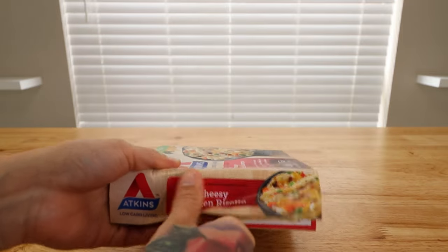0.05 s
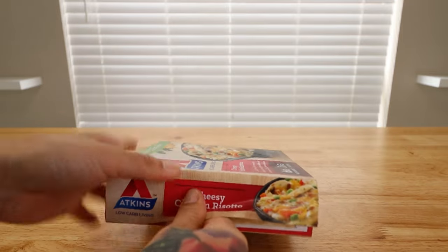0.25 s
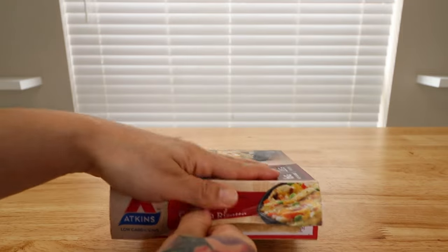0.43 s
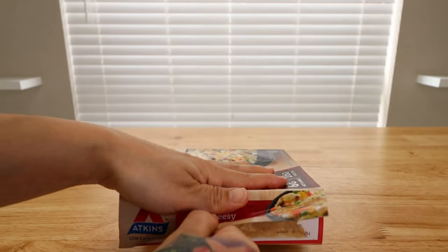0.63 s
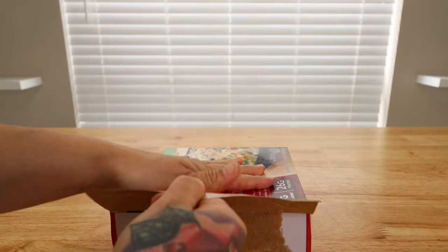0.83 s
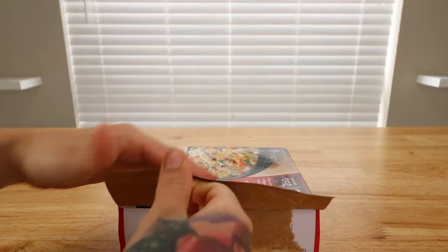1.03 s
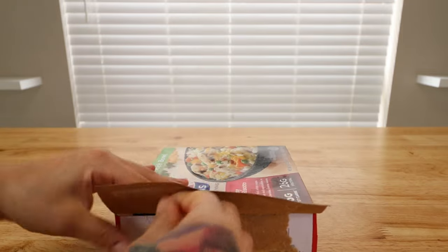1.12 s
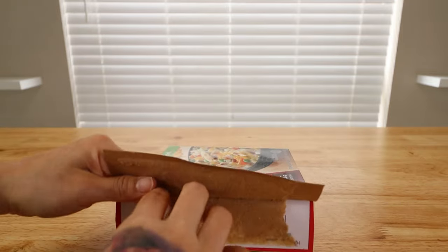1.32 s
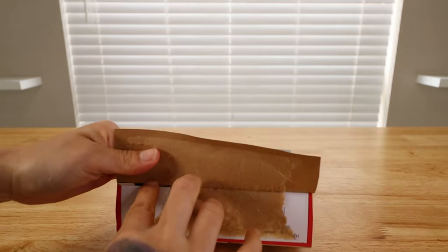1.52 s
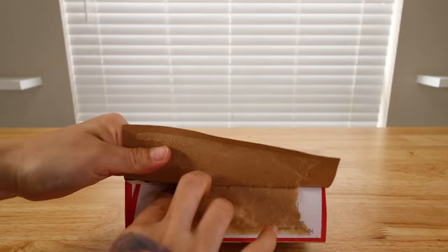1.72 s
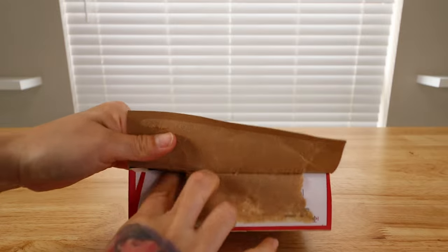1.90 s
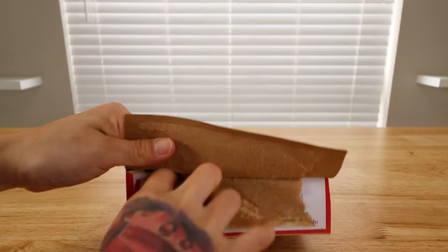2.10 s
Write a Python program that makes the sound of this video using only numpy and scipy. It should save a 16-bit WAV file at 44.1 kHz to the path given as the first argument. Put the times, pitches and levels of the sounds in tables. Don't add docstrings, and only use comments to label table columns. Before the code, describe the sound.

A glued cardboard box is torn open by hand, crackling, then bursting with a hollow knock

```python
import sys
import numpy as np
from scipy import signal
from scipy.fft import rfft, irfft, next_fast_len
from scipy.io import wavfile
from scipy.ndimage import uniform_filter1d, map_coordinates

SR = 44100
rng = np.random.default_rng(int(sys.argv[2]) if len(sys.argv) > 2 else 0)


def natural_amplitude(level_db):
    exponent = np.asarray(level_db, float) / 20
    return 10 ** exponent


def waveform_to_disk(signal):
    frames = np.transpose(np.atleast_2d(signal))
    scaled = np.clip(frames, -1, 1) * 32767
    samples = np.round(scaled).astype(np.int16)
    wavfile.write(sys.argv[1], SR, samples)


N = 94815


def unit(x):
    return x / np.sqrt(np.mean(x ** 2) + 1e-20)


def along(points, hz):
    f, v = np.transpose(points)
    return np.interp(np.log(hz + 1), np.log(f + 1), v)


def coloured(x, points, tilt_db=0.):
    m = next_fast_len(len(x) + 8192)
    hz = np.fft.rfftfreq(m, 1 / SR)
    level_db = along(points, hz) + tilt_db * np.log2(hz / 3000 + .05)
    cepstrum = irfft(np.log(np.maximum(natural_amplitude(level_db), 1e-6)), m)
    cepstrum[1:m // 2] *= 2
    cepstrum[m // 2 + 1:] = 0
    return irfft(rfft(x, m) * np.exp(rfft(cepstrum)), m)[:len(x)]


def wobble(rate):
    knots = rng.standard_normal(int(N * rate / SR) + 4)
    return map_coordinates(knots, [np.arange(N) * rate / SR])


def patchy(x, patchy_db):
    z = signal.stft(x, nperseg=128)[2]
    field = uniform_filter1d(rng.standard_normal(z.shape), size=4, axis=0)
    field = uniform_filter1d(field, size=5, axis=1)
    return signal.istft(z * natural_amplitude(patchy_db * unit(field)), nperseg=128)[1][:len(x)]


def grains(count, per_s, spread_db, hiss):
    u = rng.random((3, count))
    breaks = u[0] < per_s / SR
    force_db = np.minimum(-spread_db * np.log(u[1] + 1e-9), 12)
    clicks = breaks * natural_amplitude(force_db) * np.sign(u[2] - .5)
    return unit(clicks) + hiss * rng.standard_normal(count)


def ring(hz, db, t60, t, rise_s):
    return natural_amplitude(db - 60 * t / t60) * np.sin(2 * np.pi * hz * t) * (1 - np.exp(-t / rise_s))


def add(out, s, x):
    part = out[max(round(s * SR), 0):][:len(x)]
    part += x[:len(part)]


# (frequency [Hz], level [dB])
HUSH_COLOUR = [(15, 4), (25, -5), (185, 6.5), (277, -2), (624, -9), (818, -14), (2910, -8.5), (5880, -18.5),
               (16000, -79)]


def hush():
    return natural_amplitude(-48) * unit(coloured(rng.standard_normal(N), HUSH_COLOUR))


# (frequency [Hz], t60 [s])
ROOM_DECAY = [(150, 0.88), (1000, 0.47), (4000, 0.53), (12000, 0.23695)]


def room(x):
    out, step = np.zeros(N), SR // 8
    for i in range(0, N, step):
        hz, t, z = signal.stft(rng.standard_normal(SR // 2), SR, nperseg=256)
        decay = natural_amplitude(-60 * t / along(ROOM_DECAY, hz)[:, None])
        tail = signal.istft(z * decay, SR, nperseg=256)[1]
        tail /= np.linalg.norm(tail)
        add(out, i / SR + .004, signal.fftconvolve(x[i:i + step], tail))
    return out


# (time [s], level [dB], pitch [Hz])
WALL_THUMPS = [(0.102, -38.5, 103), (0.10049, -12, 1140), (.1, -21, 286), (0.24, -20, 177), (0.398, -12.5, 384),
               (0.4, -15, 152), (0.488, -26, 110), (0.8015, 0.5, 1500), (1.492, -28, 343.85), (1.2, -33, 92.39),
               (1.064, -14.5, 585.93), (.812, -9, 346), (1.061, -23, 240), (1.755, -14, 460)]


def thumps():
    out, t = np.zeros(N), np.arange(SR) / SR
    for s, db, hz in WALL_THUMPS:
        add(out, s, ring(hz, db, 11 / hz, t, 0.84 / hz))
    return out


# (frequency [Hz], level [dB], t60 [s])
BOX_MODES = [(111, -28.5, 0.2162), (191.2, -9.5, 0.25), (202.2, -11.5, 0.25756), (151.8, -27.5, 0.3784),
             (383.86, -28, 0.19), (187.7, -33.5, 1.72), (202.3, -26.5, 0.92), (106, -44, 2.3),
             (159.3, -42.5, 3.5)]


def boom():
    out, t = np.zeros(N), np.arange(SR) / SR
    settle = np.minimum(t / .6, 1) ** 2
    box = np.zeros(SR)
    for k, (hz, db, t60) in enumerate(BOX_MODES):
        unsteady = natural_amplitude(3 * settle * wobble(23)[:SR])
        box += (-1) ** k * ring(hz, db, t60, t, 0.002708) * unsteady
    add(out, .812, box)
    return out


CLUMP_DB = 2.5
# (time [s], fizz level [dB], creak level [dB])
STRAIN = [(0, -48.5, -58), (.07, -63, -45), (.2, -51.5, -46), (0.381, -57.5, -44.5), (0.491, -47.5, -37.5),
          (.6, -40.5, -42), (.76, -34, -39.5), (.86, -40.5, -36), (1.05, -55.5, -48.5), (1.52, -55.5, -48),
          (1.63, -66, -54.5), (1.688, -47.5, -40), (1.84, -46, -43), (1.91, -58.5, -48.5),
          (2.0, -44, -40.5), (2.15, -62, -47.5)]
# (frequency [Hz], level [dB])
FIZZ_COLOUR = [(880, -8), (1500, 0), (1850, 0.5), (3220, 0.5), (4460, 0), (7760, 2), (11000, -8.5),
               (16000, -12)]
# (frequency [Hz], level [dB])
CREAK_COLOUR = [(35, 14), (60, -19), (193, 2), (309, 2), (674, 2), (1200, 2.5), (1470, -4), (1620, -4.5),
                (2500, -15), (3250, -58), (5500, -120)]


def pull():
    s, fizz_db, creak_db = np.transpose(STRAIN)
    t = np.arange(N) / SR
    fizz = unit(patchy(coloured(grains(N, 1200, 8.0, 0.53), FIZZ_COLOUR), CLUMP_DB))
    fizz *= natural_amplitude(np.interp(t, s, fizz_db) + 1.9885 * wobble(41.23))
    creak = unit(coloured(grains(N, 270, 6.8, 1.0), CREAK_COLOUR))
    creak *= natural_amplitude(np.interp(t, s, creak_db) + 2.3 * wobble(30.5))
    return fizz + creak


# (time [s], length [s], level [dB], start pitch [Hz], end pitch [Hz])
TEAR_RUNS = [
    (0.8, .022, -16, 2780, 6500),
    (1.283, 0.046, -42, 1900, 1420),
    (.64, 0.074, -42.5, 6800, 7600),
    (1.665, 0.0605, -40.5, 1000, 1200),
    (1.495, 0.033, -48.5, 5800, 5800),
    (1.956, 0.046, -41.5, 2151, 2900),
    (1.995, 0.087, -41.5, 819.8, 1239.9),
    (2.0, 0.097, -42.5, 4100, 7700),
]


def runs():
    out = np.zeros(N)
    width_hz = 700
    band = [(width_hz, 0), (4 * width_hz, -24), (20000, -60)]
    for s, length, db, from_hz, to_hz in TEAR_RUNS:
        u = np.arange(SR // 8) / SR / length
        swing = coloured(grains(len(u), 3600, 5.8, 0.46), band)
        glide = np.sin(2 * np.pi * np.cumsum(from_hz + (to_hz - from_hz) * u) / SR)
        swell = np.abs(np.sin(np.pi * np.clip(u, 0, 1))) ** 0.554 * (u < 1)
        add(out, s, natural_amplitude(db) * swell * unit(swing * glide))
    return out


# (time [s], level [dB], pitch [Hz])
PARTING = [(.0915, -20, 2940), (.2715, -28, 8500), (.2415, -24, 2200), (1.483, -40, 13000),
           (.153, -22, 7000), (.293, -31.5, 4486), (.3675, -29, 5000), (.390, -41.5, 4000),
           (0.4318, -22.5, 4992), (.457, -20, 4975), (.463, -34, 7000), (0.468, -24, 4440),
           (.4862, -32, 9000), (.516, -28.5, 6500), (.527, -19, 8000), (.5405, -24, 5000),
           (.5515, -27, 6021), (.555, -19, 7500), (.566, -24, 8000), (.569, -30, 8000), (.572, -25, 8000),
           (.582, -26, 7999), (.586, -24, 7000), (.678, -24.5, 3230), (.7135, -22.5, 7000),
           (0.7502, -18, 5060), (0.776, -15, 4141), (0.7855, -14, 4000), (0.791, -13, 7400),
           (0.7902, -1, 4000), (.799, -19, 3300), (0.8064, -12, 2600), (.8095, -6, 5473),
           (1.324, -40, 3000), (1.442, -37.5, 1520), (1.495, -31, 1010), (1.6453, -38.5, 4905),
           (1.6762, -35, 2004), (1.7468, -20, 2250), (1.7571, -17, 2740), (1.8717, -26.5, 2600),
           (1.881, -26.5, 3000), (1.918, -34, 1110), (1.929, -27.5, 1130), (1.9407, -23.5, 6900),
           (1.9716, -36, 7500), (2.0061, -21.5, 2350), (2.0714, -30.5, 6986), (2.0835, -15.5, 6960)]


def fibres():
    out, t = np.zeros(N), np.arange(SR // 40) / SR
    for s, db, hz in PARTING:
        t60 = 15 / hz
        add(out, s, ring(hz, db, t60, t, 0.00006) + ring(hz * 1.26, db - 5, t60, t, 0.00006))
    return out


# (time [s], rise [s], hold [s], level [dB], brightness [dB per octave])
TEARS = [(0.117, 0.033, 0.0025, -31, 6), (0.557, 0.00949, 0.02297, -36, 6.5),
         (.765, 0.028, 0.00434, -20.5, 2.5), (.787, 0.0041305, 0.002, -6.5, 2),
         (.794, 0.0049, 0.013, -15, 2), (0.804, .005, 0.005, -16, 6), (1.242, 0.0093, 0.0047, -40, -3.5),
         (1.278, 0.01191, 0.042, -42, -0.0938), (1.462, .004, 0.067, -42.5, 0),
         (1.554, 0.018, 0.018, -47.5, -1.5), (1.687, 0.01254, 0.008, -38.5, 0),
         (1.74, 0.0099, 0.0019, -18.5, 2.0665), (1.752, 0.004401, 0.011, -17, 3),
         (1.768, 0.002292, 0.014, -26, 0), (1.86, 0.0089, 0.01, -43, 1),
         (1.995, 0.0097, 0.036, -33.5, 0.73), (2.037, 0.016, 0.04031, -36, 7)]
# (frequency [Hz], level [dB])
TEAR_COLOUR = [(180, -11.5), (300, -1), (1230, 2.5), (1720, -7.5), (2320, 0.5), (2650, -2.5), (6300, -6.5),
               (14200, -23.5), (16000, -34.5)]


def rips():
    out, t = np.zeros(N), np.arange(SR // 5) / SR
    for s, rise, hold, db, tilt_db in TEARS:
        t60 = 0.015314 + 1.693 * rise
        release = natural_amplitude(-60 * np.maximum(t - rise - hold, 0) / t60)
        shape = np.clip(t / rise, 0, 1) ** 1.24 * release
        tearing = coloured(grains(len(t), 5000, 4.5, 0.36), TEAR_COLOUR, tilt_db)
        add(out, s, natural_amplitude(db) * shape * unit(patchy(tearing, CLUMP_DB)))
    return out


# (time [s], crack level [dB], box knock level [dB], knock pitch [Hz])
GLUE_SNAPS = [(0.0024, -23.5, -34, 646.3), (0.0787, -27, -31, 687.3), (0.0902, -21.5, -27, 580),
              (0.1519, -20, -32.5, 590), (0.2404, -22, -19.5, 627), (0.2464, -22, -28.5, 550),
              (0.2701, -18, -25.5, 615), (0.2922, -26, -39.5, 665), (0.3096, -31.5, -32, 1049),
              (0.3154, -27, -38.5, 634), (0.3364, -36, -24.5, 347), (0.3664, -26, -30.5, 726),
              (0.3785, -44, -33.5, 680), (0.3944, -20, -8, 730), (0.4005, -17.5, -14, 640),
              (0.4306, -24, -25.5, 732), (0.4404, -24, -24.5, 670), (0.4559, -25, -27, 370),
              (0.4663, -25, -27, 755), (0.4753, -19, -23.5, 766), (0.4854, -28, -27, 562.5),
              (0.5004, -29, -22, 660), (0.5142, -17.5, -24, 796), (0.526, -15, -24.5, 570),
              (0.5396, -17.5, -26, 596), (0.5541, -22, -22.5, 655), (0.5736, -15, -16, 685)]
# (time [s], crack level [dB], box knock level [dB], knock pitch [Hz])
CARD_TICKS = [(0.7715, -11, -29.5, 1148), (0.7872, -3, -23, 1190), (0.8125, -22, -16, 602.3),
              (1.0768, -29, -34, 554), (1.1722, -41, -40.5, 770), (1.2067, -33, -56, 320),
              (1.2466, -31, -43, 1020), (1.296, -27.5, -42.5, 641), (1.3578, -32, -50, 703),
              (1.4685, -25, -44, 1078), (1.4743, -26, -35, 1140), (1.6443, -53, -56.5, 460.8),
              (1.6593, -27, -49, 1059), (1.6931, -18, -39, 1122), (1.7175, -23, -49.5, 447),
              (1.73, -26, -37, 347.6), (1.8695, -28.5, -44.5, 581.7), (1.8793, -27, -38, 1170),
              (1.9244, -58, -40, 560), (1.9394, -33, -36, 1120), (2.0826, -21, -32, 573),
              (2.099, -28, -59, 1120), (2.1374, -26, -61, 1120)]
# (frequency [Hz], level [dB])
CRACK_COLOUR = [(200, -21), (900, -0.5), (3000, 6), (5500, 4), (9000, -3), (16000, -15)]
# (pitch ratio [1], level [dB], relative ring time [1])
KNOCK_MODES = [(0.302, -16.5, 2.85), (1.011, -0.5, 1.34), (1.501, -2, 0.09), (2.2, -27, 0.19)]
# (frequency [Hz], level [dB])
RATTLE_COLOUR = [(100, -24), (300, 2.5), (700, 7), (1300, -2.5), (3000, -15.5), (7000, -36)]


def snaps():
    out, t = np.zeros(N), np.arange(SR // 10) / SR
    crack_t60, knock_t60, rattle_t60 = .0055, .014, 0.033
    for s, crack_db, knock_db, hz in list(GLUE_SNAPS) + list(CARD_TICKS):
        z = rng.standard_normal((2, len(t)))
        tilt_db = np.clip(0.049 * (crack_db - knock_db - 3), -3, 3)
        burst = natural_amplitude(-60 * t / crack_t60) * z[0] + 4 * (t == 0)
        crack = coloured(burst, CRACK_COLOUR, tilt_db)
        crack /= np.abs(crack).max()
        knock = np.zeros(len(t))
        for ratio, db, ring_time in KNOCK_MODES:
            mode_hz = hz * ratio * rng.normal(1, 0.042)
            mode_db = db + rng.normal(0, 1.496)
            knock += ring(mode_hz, mode_db, knock_t60 * ring_time, t, 0.00068)
        rattle = natural_amplitude(-8 - 60 * t / rattle_t60) * unit(coloured(z[1], RATTLE_COLOUR))
        add(out, s + 0.00087, natural_amplitude(crack_db) * crack + natural_amplitude(knock_db + 8) * (knock + rattle))
    return out


def scene():
    card = snaps() + rips() + pull() + fibres() + runs()
    background = hush()
    box_and_table = boom() + thumps()
    reflections = natural_amplitude(-12.5) * room(card)
    return (card + box_and_table + reflections + background)[None]


def band_limit(x):
    return signal.sosfilt(signal.butter(12, 16310, fs=SR, output="sos"), x)


def record(dry):
    low_cut = signal.butter(4, 54, "high", fs=SR, output="sos")
    mix = np.clip(signal.sosfilt(low_cut, dry), -1, 1)
    return band_limit(mix)


dry = scene()
out = record(dry)
waveform_to_disk(out)
```